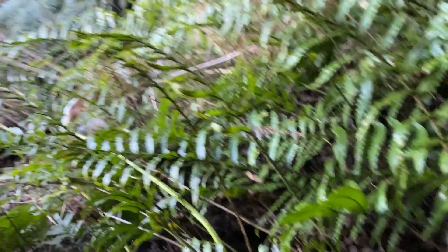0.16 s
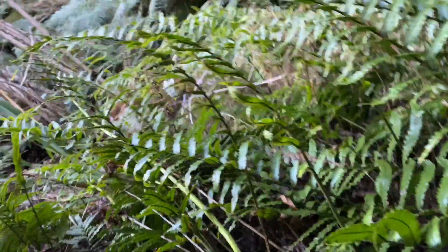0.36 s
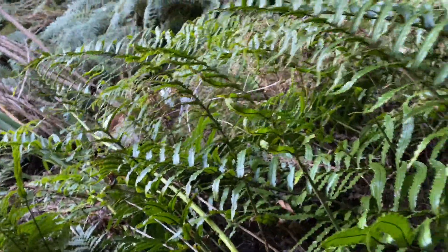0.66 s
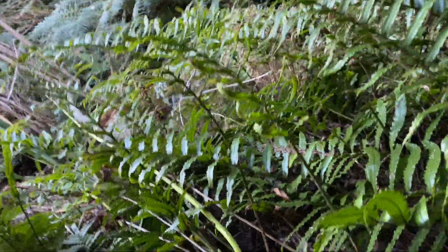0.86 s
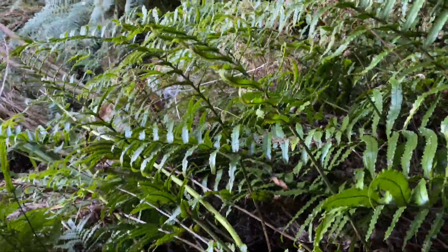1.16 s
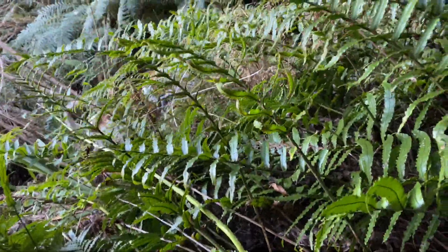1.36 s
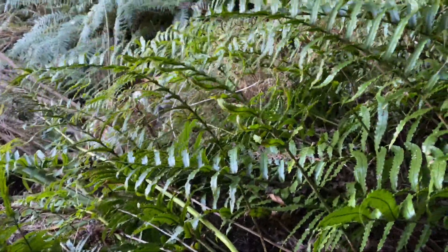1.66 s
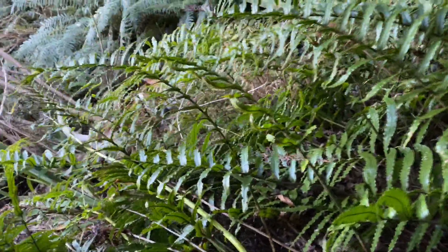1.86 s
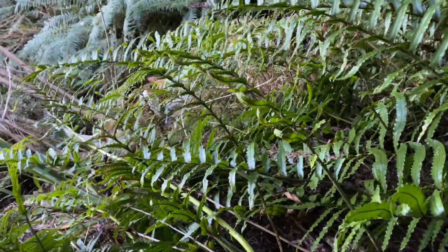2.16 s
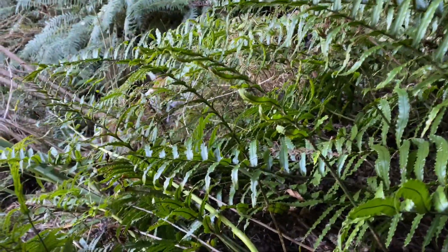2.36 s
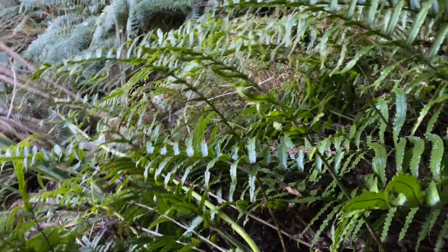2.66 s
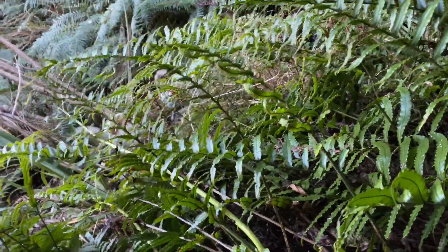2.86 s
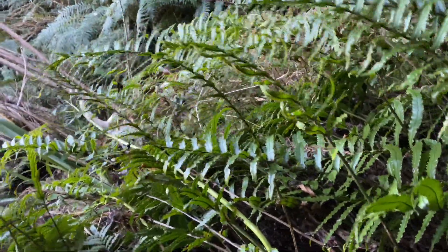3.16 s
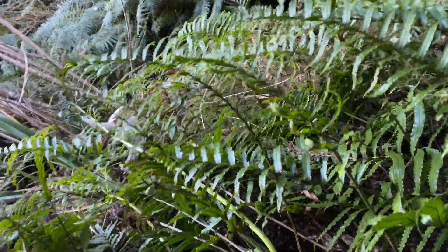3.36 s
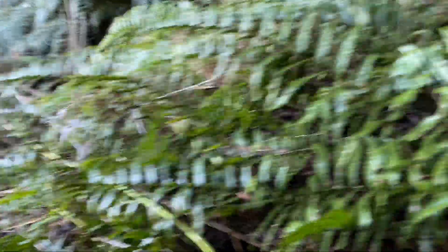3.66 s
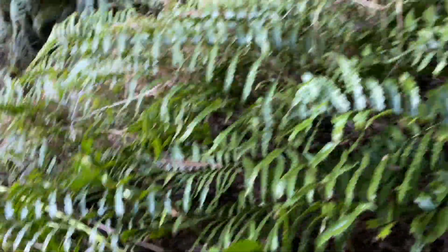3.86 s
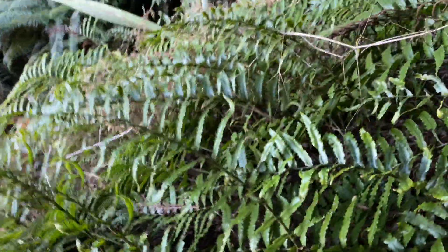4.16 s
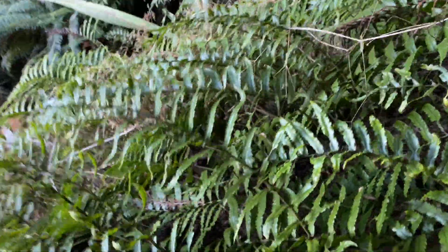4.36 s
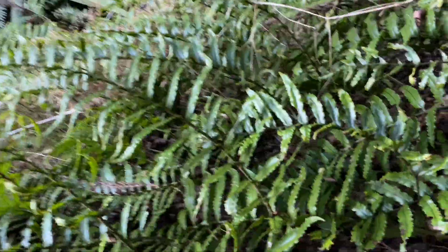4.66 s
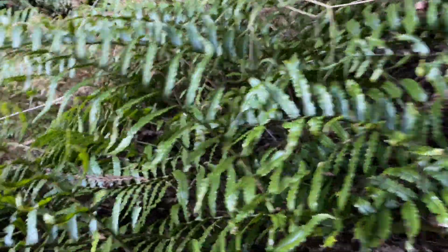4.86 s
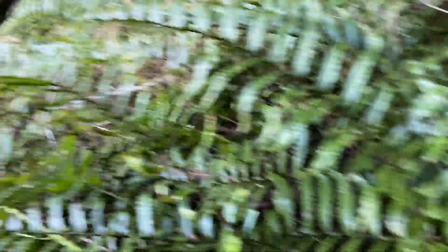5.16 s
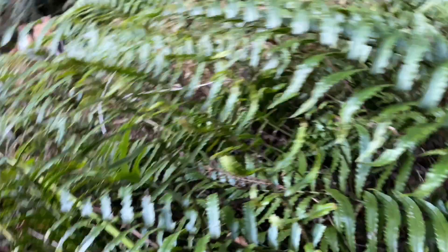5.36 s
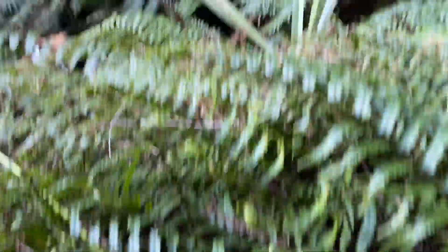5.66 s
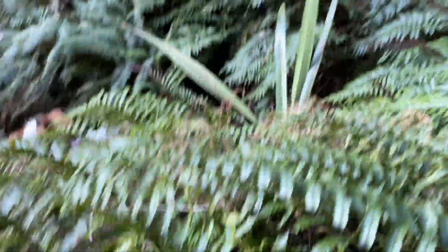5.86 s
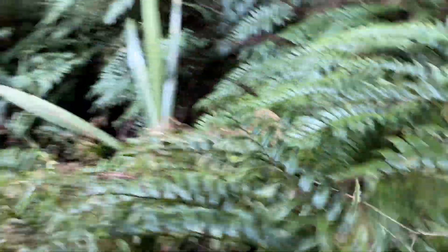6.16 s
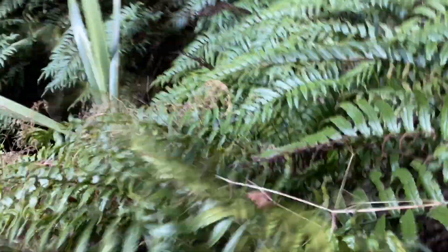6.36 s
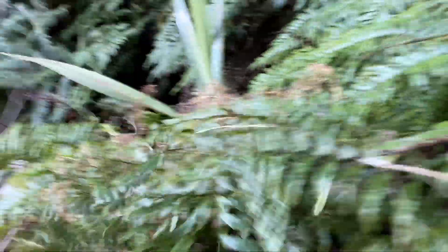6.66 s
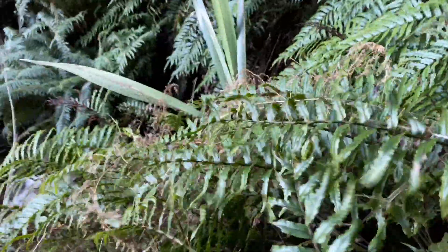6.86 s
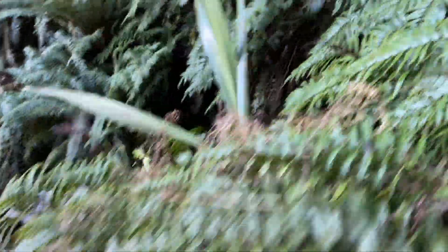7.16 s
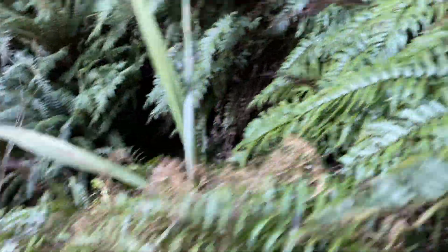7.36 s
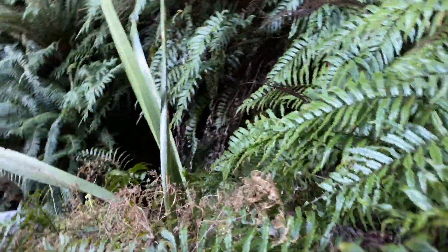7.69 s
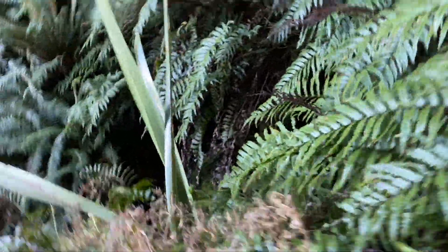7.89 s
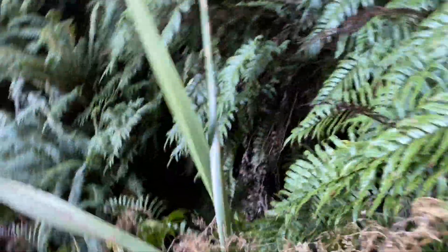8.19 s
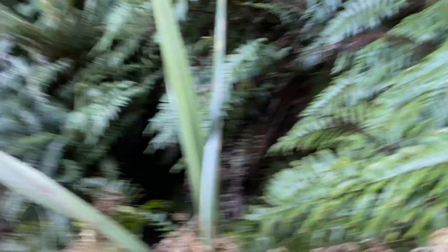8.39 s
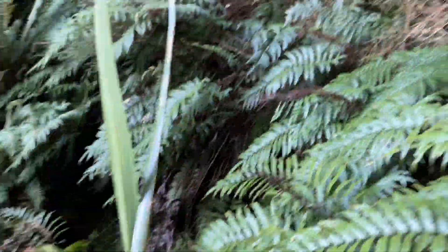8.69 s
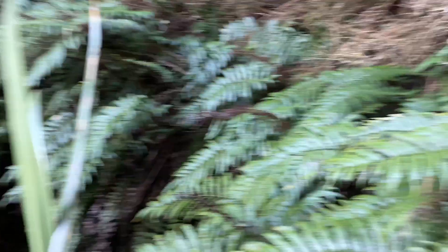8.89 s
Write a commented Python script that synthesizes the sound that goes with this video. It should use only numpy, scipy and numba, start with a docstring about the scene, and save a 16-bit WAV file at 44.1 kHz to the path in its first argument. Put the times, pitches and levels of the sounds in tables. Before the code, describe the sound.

Deep paired pig grunts with rattling throat pulses, six sharp hoarse yelps echoing off trees, and someone pushing through hissing ferns and cracking twigs.

```python
"""From the start a trapped wild pig grunts in pairs: a humming chest tone under rattling trains of throat pulses.
Almost at once a second animal to the left breaks in; by 5.2 s it has given six short, hoarse yelps, built
from fluttering partials and echoed by the trees. From 2 s dry stalks snap: noise bursts with a woody ring.
A walker pushes through the ferns, whose fronds hiss and tick, softly at first and loudly from 5.6 s."""
import sys
import numpy as np
from scipy import signal
from scipy.fft import rfft, irfft
from scipy.io import wavfile
from scipy.ndimage import uniform_filter1d, map_coordinates
from numba import njit

SR = 44100
rng = np.random.default_rng(int(sys.argv[2]) if len(sys.argv) > 2 else 0)


def boost(x):
    """Linear amplitude factor 10**(x/20) for a level x in decibels (scalar or array-like)."""
    u = np.asarray(x, float) / 20
    return 10 ** u


def master_out(mix):
    """Clip the mix to full scale and print it as 16-bit PCM to the path in sys.argv[1]."""
    frames = np.transpose(np.atleast_2d(mix))
    ceiling = np.clip(frames, -1, 1)
    pcm = np.round(ceiling * 32767).astype(np.int16)
    wavfile.write(sys.argv[1], SR, pcm)


N = 398223  # length [samples]


def slide(db_points, hz):
    """Read a spectrum on a log-frequency axis."""
    point_hz, point_db = np.transpose(db_points)
    return np.interp(np.log(hz), np.log(point_hz), point_db)


def rms_one(x):
    """Scale to rms 1."""
    return x / np.sqrt(np.mean(x ** 2) + 1e-20)


def in_time(rows):
    """Columns of a curve at every sample."""
    s, *columns = np.transpose(rows)
    return [np.interp(np.arange(N) / SR, s, c) for c in columns]


def sounding(tables, fade_s):
    """A soft gate that is open while a call sounds, then the columns of the list of calls."""
    gate = np.zeros(N)
    for rows in tables:
        gate[int(rows[0][0] * SR):int(rows[-1][0] * SR) + 2] = 1
    soft_gate = uniform_filter1d(gate, max(int(fade_s * SR), 1))
    return [soft_gate] + in_time(np.concatenate(tables))


def drift(rate):
    """Slow chance of spread about 1, from `rate` random points a second joined smoothly."""
    knots = rng.standard_normal(int(rate * N / SR) + 4)
    return map_coordinates(knots, [np.arange(N) * rate / SR + 1], order=3)


def cut(x, hz, kind, order=2):
    """Butterworth filter."""
    return signal.sosfilt(signal.butter(order, hz, kind, fs=SR, output="sos"), x)


@njit
def resonate(x, hz, width_hz, sr):
    """Two-pole resonance with a moving centre."""
    out, r = np.zeros(len(x)), np.exp(-np.pi * width_hz / sr)
    for i in range(2, len(x)):
        ringing = 2 * r * np.cos(2 * np.pi * hz[i] / sr) * out[i - 1] - r * r * out[i - 2]
        out[i] = x[i] - x[i - 2] + ringing
    return out * (1 - r * r) / 2


def placed(x, pan_db, lead):
    """Left over right by pan_db; the right ear hears it `lead` samples later."""
    late = np.interp(np.arange(N) - lead, np.arange(N), x)
    return np.array([x * boost(pan_db / 2), late * boost(-pan_db / 2)])


# how alike noise is in the two ears: (frequency [Hz], likeness [-1 to 1])
EAR_LIKENESS = [(60, 0.76), (240, 0.92), (950, 0.21), (3770, -0.018), (15000, 0.53)]


def coloured(spectrum, source, patchy_db):
    """Half-octave bands of a stereo source, each with its own level, flicker and likeness; rms 1."""
    out, edges = 0, 30 * 2 ** np.arange(0, 9.6, .5)
    for k, (low, high) in enumerate(zip(edges, edges[1:])):
        hz = np.sqrt(low * high)
        if slide(spectrum, hz) > -55:
            mid, side = cut(source[k % 2], [low, high], "band")
            alike = np.clip(slide(EAR_LIKENESS, hz), -1, 1)
            stereo = np.sqrt(1 + alike) * mid + np.sqrt(1 - alike) * side * [[1], [-1]]
            out = out + boost(slide(spectrum, hz) + patchy_db * drift(14)) * stereo
    return rms_one(out)


# chest hum, mostly two pushes a grunt, the second scooping up from low:
# (start [s], length [s], loudest level [dB], first pitch [Hz], top pitch [Hz])
HUM_PUSHES = [(0, 0.0673, -30.5, 63.4, 71), (0.368, 0.2, -23.5, 109.2, 117.5), (0.522, .17, -23, 80, 119.8),
              (0.695, .11, -32, 63.1, 75), (1.046, 0.18, -23.5, 110.1, 110.4),
              (1.206, 0.2008, -26.5, 75.34, 115.2), (1.708, 0.14, -23.5, 105, 107.9),
              (1.859, 0.2, -28.5, 67.5, 113.2), (2.331, 0.14, -24, 100.1, 108.6),
              (2.48, .16, -26, 64.73, 100.1), (3.023, 0.16, -25.5, 110.4, 108.3),
              (3.17, 0.2, -29, 65.6, 109.8), (3.708, 0.12, -24.5, 109.8, 118.5),
              (3.839, .22, -26, 84.4, 120.7), (4.3, 0.22, -27.5, 84.7, 104.5),
              (4.497, 0.18, -28.5, 74.9, 125), (4.977, 0.14, -32, 95.3, 108.7),
              (5.15, 0.18, -35.5, 91, 115), (5.657, 0.15, -25.5, 125.4, 130.5),
              (5.83, 0.22, -26, 79.9, 135), (6.082, 0.16, -34.5, 66, 69.9), (6.297, 0.18, -26, 101, 120),
              (6.479, .19, -28, 75, 118), (6.967, .14, -27.5, 105.5, 108), (7.109, .23, -26, 64.65, 120.7),
              (7.453, 0.079, -42, 63.3, 71.7), (7.653, 0.12, -23, 99.5, 103.7),
              (7.773, .22, -27.5, 65.2, 111.7), (8.272, .16, -24.5, 110.2, 114.8),
              (8.435, 0.2, -27, 70, 112.7), (8.895, 0.17, -22.5, 125.6, 137.6)]
HUM_RISE_S, HUM_FALL_S = .03, .033  # longest rise and fall; each is at most a fifth of the push
HUM_EARLY_DB, HUM_EDGE_DB, HUM_SAG_DB = -4, -2, -3.5  # softer start, outer edges, sag before the end
HUM_TOP_AT, HUM_LOUD_AT = .3, .55  # shares of the push where pitch and level peak
HUM_LOUD_PITCH, HUM_END_PITCH = .9, .53  # shares of the top pitch


def hum_shapes():
    """Each push peaks in pitch early, is loudest as it sags, then fades: (time [s], level [dB], pitch [Hz])."""
    shapes = []
    for s, length_s, db, from_hz, top_hz in HUM_PUSHES:
        early_db, late_db = db + HUM_EARLY_DB, db + HUM_SAG_DB
        rise_s, fall_s = min(HUM_RISE_S, length_s / 5), min(HUM_FALL_S, length_s / 5)
        end_s, end_hz = s + length_s, HUM_END_PITCH * top_hz
        shapes.append([
            (s, early_db + HUM_EDGE_DB, from_hz),
            (s + rise_s, early_db, from_hz),
            (s + HUM_TOP_AT * length_s, db + HUM_EARLY_DB / 2, top_hz),
            (s + HUM_LOUD_AT * length_s, db, HUM_LOUD_PITCH * top_hz),
            (end_s - fall_s, late_db, end_hz),
            (end_s, late_db + HUM_EDGE_DB, end_hz)])
    return shapes


def chest(half_db, octave_db, waver, rumble_db):
    """Strong and weak cycles alternate, which puts a line at half the pitch; air rumbles in the chest."""
    gate, level_db, hz = sounding(hum_shapes(), 0.06)
    turn = 2 * np.pi * np.cumsum(hz * (1 + waver * drift(30))) / SR
    tone = np.sin(turn) + boost(octave_db) * np.sin(2 * turn + 1)
    tone += boost(half_db) * np.sin(turn / 2) + boost(half_db - 4) * np.sin(turn * 3 / 2)
    rumble = rms_one(resonate(rng.standard_normal(N), hz, 82.0, SR))
    hum = rms_one(rms_one(tone) + boost(rumble_db) * rumble)
    flutter_db = 1.5 * drift(35)
    return gate * boost(level_db + flutter_db) * hum


# throat rattle, one row a pulse train:
# (first pulse [s], strongest pulse [s], pulse rate [1/s], low-resonance level [dB], upper-resonance level [dB])
PULSE_TRAINS = [(.346, 0.461, 60.1, -34.5, -36), (.555, 0.595, 54, -33.5, -31),
                (1.038, 1.071, 64.1, -34.5, -32), (1.227, 1.264, 65, -34.5, -32.5),
                (1.715, 1.72, 49.5, -35.5, -37), (1.899, 1.943, 60, -40.5, -36),
                (2.329, 2.333, 53.3, -35.5, -33.5), (2.501, 2.55, 66.2, -38, -43.5),
                (3.009, 3.032, 50.4, -37.5, -37), (3.194, 3.243, 55, -40.5, -38),
                (3.698, 3.763, 57.4, -37, -35.5), (3.874, 3.938, 56.3, -34, -36),
                (4.302, 4.322, 59.1, -34, -38), (4.506, 4.565, 60, -38, -33),
                (5.172, 5.225, 52.4, -46.5, -42), (5.61, 5.702, 73, -34.5, -34),
                (5.843, 5.918, 66.2, -29, -37.5), (6.307, 6.344, 65.1, -36, -48.5),
                (6.489, 6.523, 62, -36, -35.5), (6.956, 6.994, 52.3, -32.5, -34.5),
                (7.128, 7.195, 59.3, -31, -33), (7.645, 7.686, 48.5, -33.5, -34.5),
                (7.796, 7.839, 56.3, -27.5, -29), (8.238, 8.314, 58.2, -32, -33),
                (8.43, 8.512, 56, -29, -36.5), (8.891, 8.985, 66.1, -33, -32.5)]
TRAIN_SWELL_DB, TRAIN_BRIGHTEN_DB = 5.5, 6.5  # growth of low and upper level up to the strongest pulse
TRAIN_HOLD_S, TRAIN_TAIL_S = .018, .09  # both counted from the strongest pulse
TRAIN_FADE_DB, TRAIN_DULL_DB = 14.5, 60.5  # loss of low and upper level by the end of the tail


def train_shapes():
    """Each train swells, holds, fades and dulls: (time [s], rate [1/s], low level [dB], upper level [dB])."""
    return [[(s, per_s, db - TRAIN_SWELL_DB, bright_db - TRAIN_BRIGHTEN_DB),
             (top_s, per_s, db, bright_db),
             (top_s + TRAIN_HOLD_S, per_s, db, bright_db),
             (top_s + TRAIN_TAIL_S, per_s, db - TRAIN_FADE_DB, bright_db - TRAIN_DULL_DB)]
            for s, top_s, per_s, db, bright_db in PULSE_TRAINS]


# the throat's three moving resonances, and how far left its sound lies:
# (time [s], low [Hz], middle [Hz], top [Hz], left over right [dB])
THROAT_SHAPE = [(0, 514, 1516, 2090, 2.3), (4.7, 519, 1580, 2260, 8.9), (5.6, 527, 1450, 2060, 6.9),
                (9.03, 607, 1340, 2060, 11.5)]


def rattle(jitter, uneven_db, puff_s, puff_db):
    """Slow separate slaps of the folds, each a click and a puff of air, ring the throat."""
    trains = train_shapes()
    gate, per_s, level_db, bright_db = sounding(trains, 0.0044)
    low_hz, mid_hz, top_hz, pan_db = in_time(THROAT_SHAPE)
    slaps, chance = np.zeros(N), rng.standard_normal((len(trains), 30, 2))
    for rows, draw in zip(trains, chance):
        start = int(rows[0][0] * SR)
        gaps = SR / per_s[start] * (1 + jitter * draw[1:, 0])
        at = start + np.cumsum(np.r_[0, gaps]).astype(int)
        inside = at < min(rows[-1][0] * SR, N)
        slaps[at[inside]] = boost(uneven_db * draw[inside, 1])
    puff_shape = signal.lfilter([1], [1, -np.exp(-1 / (puff_s * SR))], slaps + 1e-18)
    source = slaps + boost(puff_db) * puff_shape * rng.standard_normal(N)
    low = resonate(resonate(source, low_hz, 115.0, SR), low_hz, 300.0, SR)
    upper = resonate(source, mid_hz, 110.0, SR) - boost(-3) * resonate(source, top_hz, 140.0, SR)
    # fixed resonances: (frequency [Hz], width [Hz], level [dB])
    for hz, width_hz, peak_db in [(1031.6, 66.4, -2), (2547, 30, -1.5), (3160, 420, -16),
                                  (4180, 233, -17), (7000, 1400, -75)]:
        upper += boost(peak_db) * resonate(source, np.full(N, float(hz)), float(width_hz), SR)
    open_rms = np.sqrt(np.mean(gate ** 2))
    low = open_rms * rms_one(low)
    upper = open_rms * rms_one(cut(upper, 5500, "low"))
    return placed(boost(level_db) * low, pan_db, 1.5) + placed(boost(bright_db) * upper, 0.86, 2.4)


BREATH_DB, BREATH_LEAD_S = -17.5, .059  # level over the chest hum; it starts a little earlier


def breath(low_width_hz, upper_width_hz, upper_db):
    """Air pushed out with each grunt hisses through the same moving throat resonances."""
    gate, hum_db, _ = sounding(hum_shapes(), 0.055)
    low_hz, mid_hz, top_hz, pan_db = in_time(THROAT_SHAPE)
    air = rng.standard_normal(N)
    upper = resonate(air, mid_hz, upper_width_hz, SR) - resonate(air, top_hz, upper_width_hz, SR)
    hiss = rms_one(resonate(air, low_hz, low_width_hz, SR) + boost(upper_db) * upper)
    push = np.roll(gate * boost(hum_db + BREATH_DB), -int(BREATH_LEAD_S * SR))
    return placed(push * hiss, pan_db, 2.4)


# narrow bands of snout air: (frequency [Hz], width of the sharper of two passes [Hz], relative level [dB])
SNOUT_BANDS = [(1834, 100, 0), (3880, 800, -3.5), (6070, 440, -6.5)]


def wheeze(level_db, draw_s):
    """Faint narrow bands of air between the grunts, perhaps the pig drawing breath."""
    out, silent = 0, 1 - sounding(hum_shapes(), draw_s)[0]
    for hz, width_hz, db in SNOUT_BANDS:
        centre = np.full(N, float(hz))
        air = resonate(rng.standard_normal(N), centre, float(width_hz), SR)
        air = resonate(air, centre, 2. * width_hz, SR)
        out = out + boost(db + 3 * drift(3)) * rms_one(air)
    return boost(level_db) * silent * out


# yelps, one list a call: (time [s], level [dB], loudest partial [Hz])
YELP_CALLS = [
    [(.088, -43, 563), (.113, -19, 737), (.122, -8.5, 835), (.135, -4.5, 868), (.152, -11, 1010),
     (.186, -13.5, 1096), (.215, -14.5, 1026), (.24, -31.5, 930), (.268, -50, 900)],
    [(.864, -38, 744), (.884, -17, 792), (.897, -11, 807), (.914, -7, 817), (.93, -10, 668),
     (.949, -10.5, 645.5), (.968, -14, 618), (.982, -31, 603), (1.0, -25, 580)],
    [(1.342, -29, 720), (1.356, -24.5, 695), (1.364, -8, 699.6), (1.372, -3.5, 720.5), (1.382, -12, 720),
     (1.394, -16.5, 680), (1.415, -7.5, 635), (1.434, -21, 600), (1.462, -33.5, 592.4)],
    [(2.577, -21.5, 680), (2.592, -21, 772.5), (2.601, -10, 827), (2.612, -5, 836), (2.627, -15.5, 820),
     (2.642, -9, 682), (2.658, -9, 681.5), (2.685, -21.5, 646.3), (2.72, -35, 618)],
    [(3.345, -33.5, 602.4), (3.361, -27, 758.5), (3.371, -9.5, 802), (3.381, -5, 812), (3.397, -13.5, 805),
     (3.408, -18, 725), (3.428, -13, 655), (3.445, -20.5, 640), (3.475, -37, 645)],
    [(4.958, -38, 517), (4.974, -29, 638.6), (4.986, -18.5, 789), (4.995, -9.5, 842), (5.008, -11, 840),
     (5.02, -11, 710), (5.036, -8.5, 679), (5.065, -13, 635), (5.1, -32, 608), (5.133, -34, 500)],
]
# when the loudest partial is the third; elsewhere it is the second: (from [s], to [s])
THIRD_LOUDEST = [(.86, .924), (1.34, 1.386)]
# colour of the yelp's overtones and air: (frequency [Hz], relative level [dB per Hz])
HOARSE_SPECTRUM = [(210, -76), (350, -53), (636, -9.5), (882, 1), (1050, -9.5), (1400, -13.5), (2610, -15),
                   (3520, -46), (4500, -32.5), (5500, -46.5), (7140, -43), (8070, -76), (9000, -105),
                   (11700, -135), (19800, -120)]
STRAIN_DB = -10  # above this level the voice clears
OVER_DB, OVER_LOSS, OVER_GAIN = -10.5, 1.8, .092  # overtones: offset; dB lost per dB above, gained per dB below
HOARSE_TOP, HOARSE_LOSS = .39, .05  # hoarseness up to the strain level, and its loss per dB above
PALATE_HZ, PALATE_WIDTH_HZ, PALATE_DB = 1080, 150, -7  # a second, fixed resonance


def yelps(mouth_width_hz, skirt_db, jitter, rasp_per_s, air_db):
    """The mouth picks out one partial; hoarse folds make each partial flutter by itself, over some air."""
    gate, level_db, mouth_hz = sounding(YELP_CALLS, .008)
    third = sounding([[(s, 0), (to_s, 0)] for s, to_s in THIRD_LOUDEST], .01)[0]
    hz = mouth_hz / (2 + third)
    strain = np.maximum(level_db - STRAIN_DB, 0)
    ease = np.maximum(STRAIN_DB - level_db, 0)
    over_db = level_db + OVER_DB - OVER_LOSS * strain + OVER_GAIN * ease
    hoarse = HOARSE_TOP - HOARSE_LOSS * strain
    on = gate > 0
    hz, mouth_hz, hoarse = hz[on], mouth_hz[on], np.clip(hoarse[on], 0, 1)
    turn = 2 * np.pi * np.cumsum(hz * (1 + jitter * drift(150)[on])) / SR
    k = np.arange(1, 17)[:, None]  # partial number
    low_share = np.clip((1250 - k * hz) / 100, 0, 1)
    lifted = np.clip((k * hz - 450) / 100, 0, 1)
    picked = 1 / (1 + ((k * hz - mouth_hz) / mouth_width_hz) ** 2)
    flutter = cut(rng.standard_normal((2, len(k), len(hz))), rasp_per_s, "low")
    flutter = (flutter[0] + 1j * flutter[1]) / flutter.std()
    depth = np.clip(hoarse * (1.5 - picked) * 1.97, 0, 1)  # weak partials are the least steady
    wobble = np.sqrt(1 - depth ** 2) + depth * flutter / np.sqrt(2)
    partials = np.imag(wobble * np.exp(1j * (k * turn + k * k)))
    noise = coloured(HOARSE_SPECTRUM, rng.standard_normal((2, 2, N)), patchy_db=-7.0)[0][on]
    voice = np.zeros(N)
    voice[on] = boost(level_db[on]) * boost(air_db) * hoarse * noise
    palate = boost(PALATE_DB) / (1 + ((k * hz - PALATE_HZ) / PALATE_WIDTH_HZ) ** 2)
    low_weights = (picked + boost(skirt_db) + palate) * low_share * lifted
    over_weights = boost(slide(HOARSE_SPECTRUM, k * hz)) * (1 - low_share)
    for weights, db in [(low_weights, level_db), (over_weights, over_db)]:
        size = np.sqrt((weights ** 2).sum(axis=0) / 2 + 1e-12)
        voice[on] += boost(db[on]) * (weights * partials).sum(axis=0) / size
    return gate * voice


# faint gliding tones, most of them falling away after a yelp:
# (time [s], length [s], from [Hz], to [Hz], level [dB])
FAINT_GLIDES = [(0.232, 0.058, 532, 248, -42), (1.475, 0.05, 522, 304.7, -38),
                (2.718, 0.081, 535, 183, -48), (3.48, 0.0798, 485.5, 202, -44.5),
                (6.763, 0.024, 805, 930, -38.5)]


def glides():
    """Soft sine sweeps that swell and fade."""
    out = np.zeros(N)
    for s, length_s, from_hz, to_hz, level_db in FAINT_GLIDES:
        size = int(length_s * SR)
        turn = 2 * np.pi * np.cumsum(np.geomspace(from_hz, to_hz, size)) / SR
        out[int(s * SR):int(s * SR) + size] += boost(level_db) * np.hanning(size) * np.sin(turn)
    return out


# echoes off trunks: (delay [s], level [dB])
TRUNK_ECHOES = [(0.031, -24), (0.058, -19.5), (.094, -45), (0.132, -36.5), (.19, -33)]


def trees(x, smear_s):
    """A few dull echoes, each smeared by leaves, different on each side."""
    out, t = np.zeros((2, N)), np.arange(SR // 3) / SR
    for side in out:
        response = np.zeros(len(t))
        for delay_s, echo_db in TRUNK_ECHOES:
            smear = np.exp(-np.abs(t - delay_s) / smear_s) / np.sqrt(smear_s * SR)
            response += boost(echo_db) * rng.standard_normal(len(t)) * smear
        side += signal.fftconvolve(x, response)[:N]
    return cut(out, 3400, "low")


# short clicks: a throat slap at 1.671 s, then snapping dry stalks:
# (time [s], peak before the bass cut [dB], pitch [Hz])
SHORT_CLICKS = [(1.671, -26.5, 1546), (2.0298, -30, 3250), (2.2604, -13.5, 2060), (2.2715, -13, 1980),
                (2.286, -24, 2010), (3.3187, -31, 2430), (3.5131, -23.5, 5430), (3.6102, -31, 2930),
                (4.093, -36, 5000), (4.1393, -34, 3800), (4.9091, -24, 6470), (6.0392, -10.5, 10800),
                (6.1326, -8, 11000), (6.4435, -18, 10550), (6.6017, -2.5, 3380), (7.556, -12.5, 10900),
                (7.608, -42, 2114), (8.112, -10, 6900), (8.3724, -17, 10300), (8.4474, -15.5, 2090),
                (8.568, -12.5, 3200)]


def clicks(crack_s, ring_q, crack_db):
    """Each click is a burst of broad noise a few ms long with a brief woody ring."""
    out, t = np.zeros(N), np.arange(SR // 40) / SR
    for s, peak_db, hz in SHORT_CLICKS:
        noise = cut(rng.standard_normal(len(t)), min(2.1 * hz, .45 * SR), "low", order=1)
        crack = boost(crack_db) * rms_one(noise) * np.exp(-t / crack_s)
        ring = np.sin(2 * np.pi * hz * t) * np.exp(-np.pi * hz * t / ring_q)
        click = crack + ring
        out[int(s * SR):int(s * SR) + len(t)] += boost(peak_db) * click / np.abs(click).max()
    return placed(cut(out, 860, "high"), 0.7, 1.6)


# fronds brushed aside: (time [s], hiss level [dB])
FROND_HISS = [(0, -59), (.4, -74.5), (1.0, -56.5), (1.5, -73), (2.05, -65.5), (2.27, -44), (2.4, -70),
              (2.72, -81), (2.9, -57.5), (3.32, -66), (3.5, -63), (4.05, -55.5), (4.4, -58), (4.7, -50),
              (4.98, -49), (5.15, -62), (5.55, -51.5), (5.66, -33.5), (6.08, -34.5), (6.22, -39.5),
              (6.32, -32), (6.58, -33), (6.75, -42), (7.1, -40.5), (7.35, -49.5), (7.6, -46), (7.78, -33),
              (7.88, -29), (8.17, -41.5), (8.45, -40.5), (8.63, -32.5), (9.03, -36.5)]
# colour of the fern hiss: (frequency [Hz], relative level [dB per Hz])
FERN_SPECTRUM = [(500, -26.5), (1200, -0.5), (2500, 0), (4500, 0), (6500, -3.5), (10000, -5.5), (15500, -3),
                 (17000, -47)]
# colour of the dull noise: (frequency [Hz], relative level [dB per Hz])
FOREST_SPECTRUM = [(18, -34), (30, -9), (71, 7.5), (303, -9), (640, -6), (1270, -10.5), (1640, -12.5),
                   (2410, -17), (2990, -25.5), (5000, -29), (6500, -59), (11000, -120)]
FOREST_DB, SWISH_DB, SNOUT_DB = -49.5, -8, -16  # still undergrowth; swish over hiss; snout air over chest hum


def fronds(per_s, spread_db, smooth_db):
    """Dense tiny leaf ticks over a smooth hiss; one dull noise for undergrowth, swish and snout air."""
    hiss_db, = in_time(FROND_HISS)
    gate, hum_db, _ = sounding(hum_shapes(), 0.066)
    tick_db = spread_db * np.minimum(rng.exponential(1, (2, 1, N)), 4)
    ticks = (rng.random((2, 1, N)) < per_s / SR) * boost(tick_db)
    grain = rng.standard_normal((2, 2, N)) * (boost(smooth_db) + ticks)
    hiss = boost(hiss_db) * coloured(FERN_SPECTRUM, grain, patchy_db=1.0)
    dull = coloured(FOREST_SPECTRUM, rng.standard_normal((2, 2, N)), patchy_db=1.2)
    undergrowth = boost(FOREST_DB + 4.0 * drift(5)) * dull
    snout_air = gate * boost(hum_db + SNOUT_DB) * dull
    swish = boost(hiss_db + SWISH_DB) * cut(dull, 154, "high")
    return hiss + undergrowth + snout_air + swish


def scene():
    """Pig, yelping animal, short clicks and ferns."""
    hum = chest(half_db=-8, octave_db=-14, waver=.015, rumble_db=-13)
    throat = rattle(jitter=.03, uneven_db=1.8, puff_s=.004, puff_db=-19)
    pushed_air = breath(low_width_hz=128.0, upper_width_hz=250., upper_db=-14.5)
    drawn_air = placed(wheeze(level_db=-58.5, draw_s=0.14), 2.0, 2.7)
    cry = yelps(mouth_width_hz=70, skirt_db=-20, jitter=.004, rasp_per_s=40.4, air_db=-1) + glides()
    echo = trees(cry, smear_s=.02)
    short_clicks = clicks(crack_s=.003, ring_q=4.0, crack_db=-3)
    ferns = fronds(per_s=460, spread_db=8.0, smooth_db=7.0)
    return hum + throat + pushed_air + drawn_air + placed(cry, 6.5, 5.36) + echo + short_clicks + ferns


DUCK_ABOVE_DB, DUCK_SHARE = -30, .14  # the gain drops by this share of the dB above the level
HELD_FALL_DB_PER_S, DUCK_SMOOTH_S = 75.5, .023  # fall of the held loudness; smoothing of the gain


def gain_control(x):
    """Loud moments turn the gain down; it climbs back at a steady rate."""
    fall = HELD_FALL_DB_PER_S * np.arange(N) / SR
    level_db = 10 * np.log10(uniform_filter1d((x ** 2).mean(axis=0), SR // 100) + 1e-12)
    held_db = np.maximum.accumulate(level_db + fall) - fall
    duck_db = DUCK_SHARE * np.maximum(held_db - DUCK_ABOVE_DB, 0)
    r = np.exp(-1 / (DUCK_SMOOTH_S * SR))
    return x * boost(-signal.lfilter([1 - r], [1, -r], duck_db))


def low_pass(x):
    """Removes everything above the highest recorded frequency."""
    return signal.sosfilt(signal.butter(12, 17000, fs=SR, output="sos"), x)


SHARED_ABOVE_HZ = 6500  # treble common to both sides
IN_STEP_HZ, TURN_HZ = 7050, 4150  # where the sides are in step; Hz per turn of phase between them


def record(dry):
    """The microphone feeds one treble to both sides, 0.24 ms apart; gain follows loudness, peaks are rounded."""
    hz = np.fft.rfftfreq(N, 1 / SR)
    left, right = rfft(cut(gain_control(dry), 59, "high", order=3))
    shared = 1 / (1 + np.exp((SHARED_ABOVE_HZ - hz) / 200))
    turned_left = left * np.exp(2j * np.pi * (hz - IN_STEP_HZ) / TURN_HZ)
    right = np.sqrt(1 - shared) * right + np.sqrt(shared) * turned_left
    spectrum = np.array([left, right]) / (1 + (hz / 15900) ** 120)  # steep end to the treble
    mix = 1.021 * np.tanh(irfft(spectrum, N) / 0.96)
    return low_pass(mix)


dry = scene()
out = record(dry)
master_out(out)
```